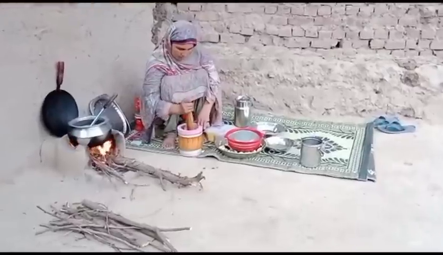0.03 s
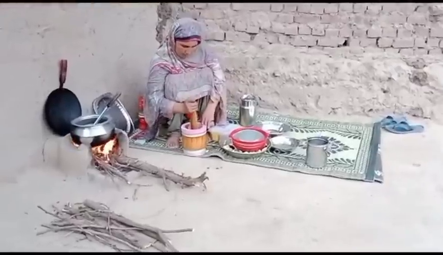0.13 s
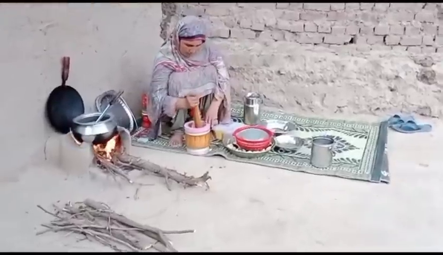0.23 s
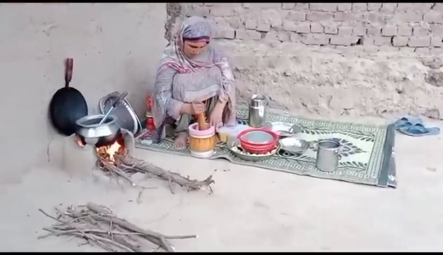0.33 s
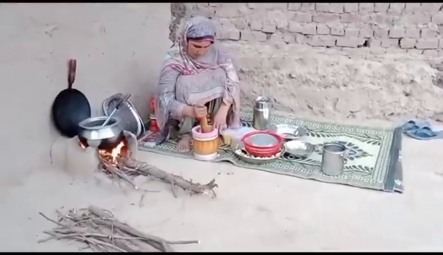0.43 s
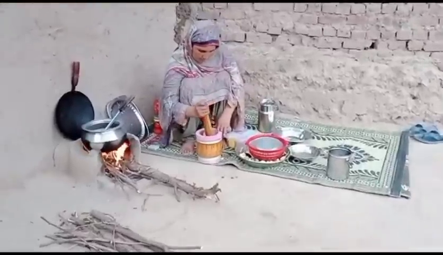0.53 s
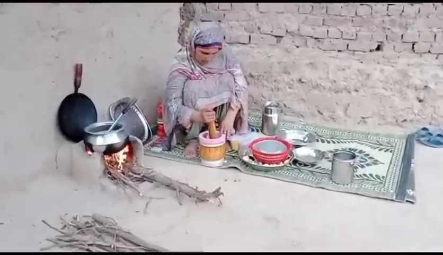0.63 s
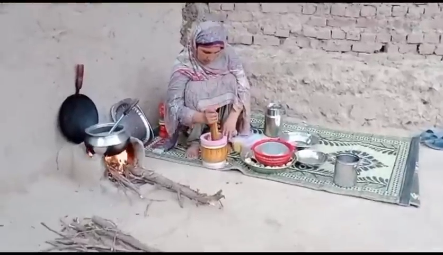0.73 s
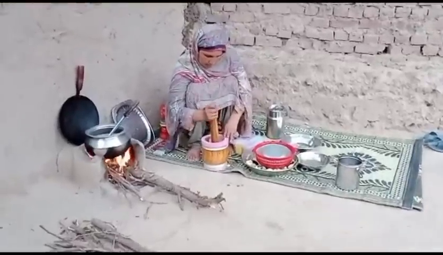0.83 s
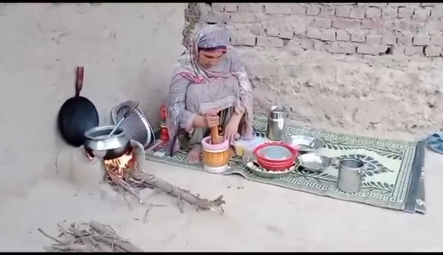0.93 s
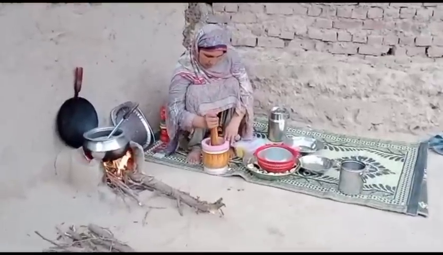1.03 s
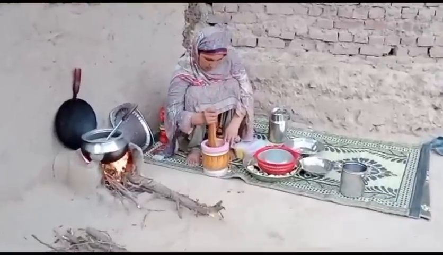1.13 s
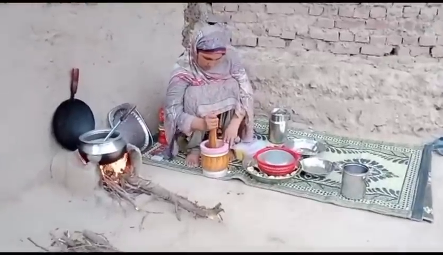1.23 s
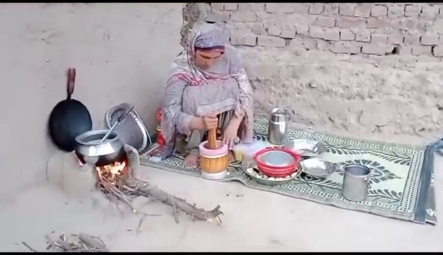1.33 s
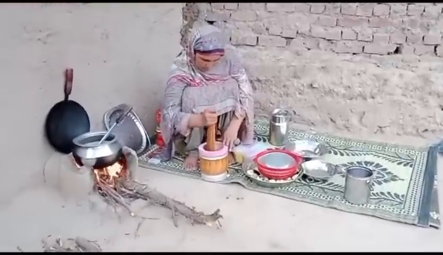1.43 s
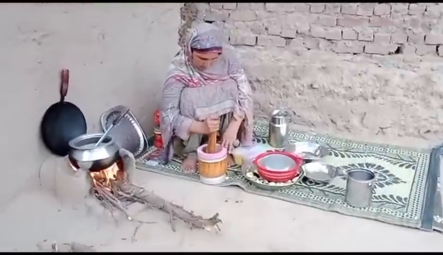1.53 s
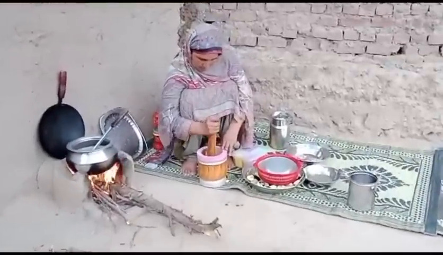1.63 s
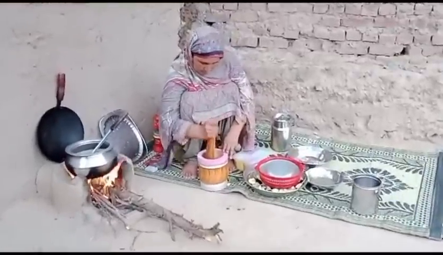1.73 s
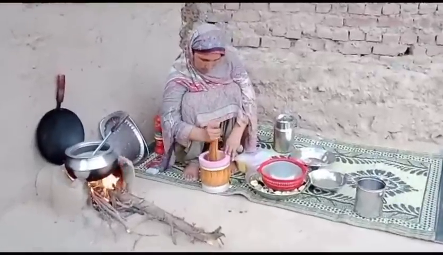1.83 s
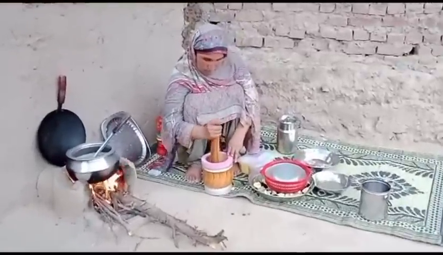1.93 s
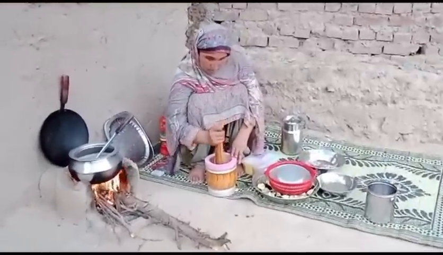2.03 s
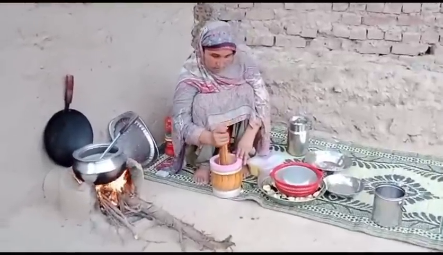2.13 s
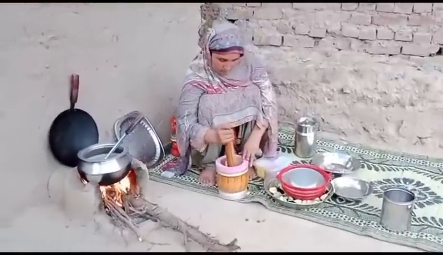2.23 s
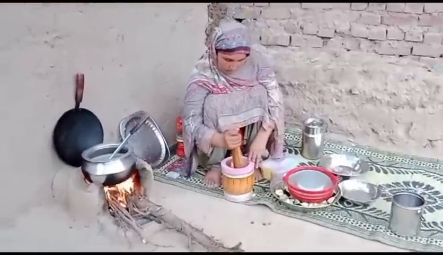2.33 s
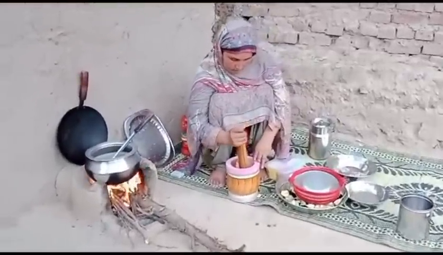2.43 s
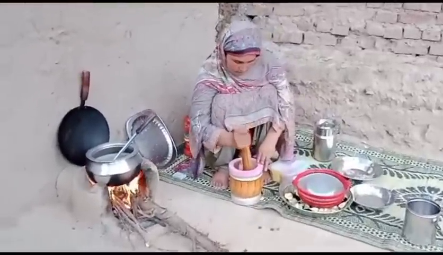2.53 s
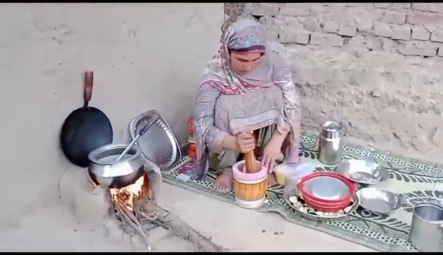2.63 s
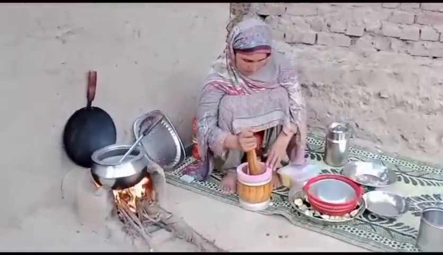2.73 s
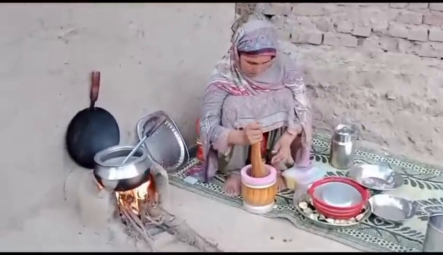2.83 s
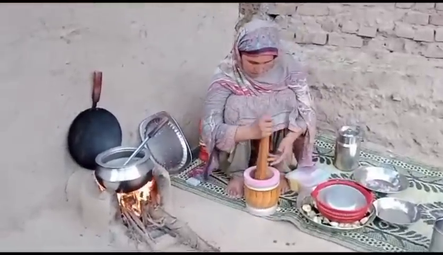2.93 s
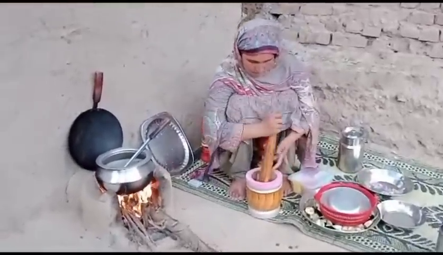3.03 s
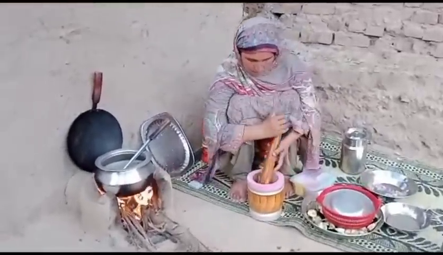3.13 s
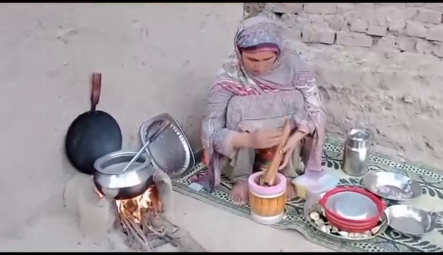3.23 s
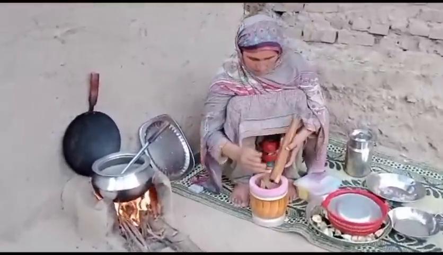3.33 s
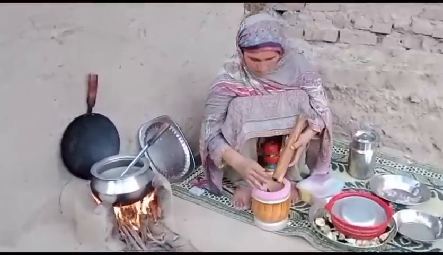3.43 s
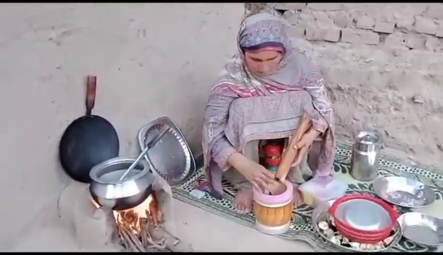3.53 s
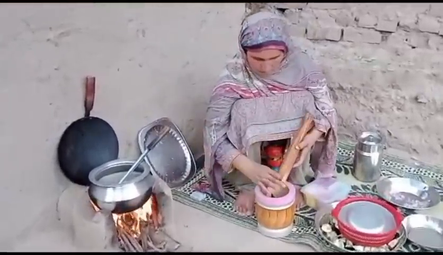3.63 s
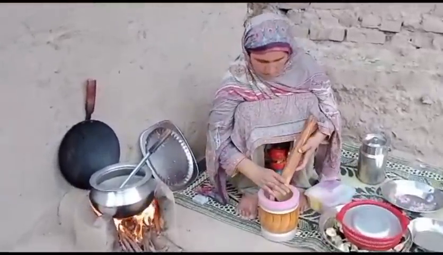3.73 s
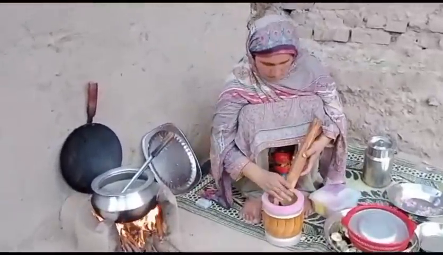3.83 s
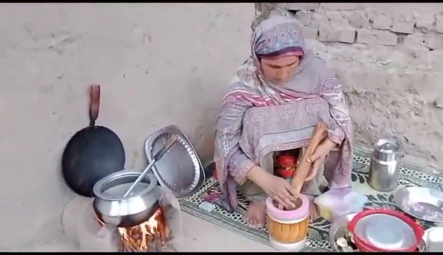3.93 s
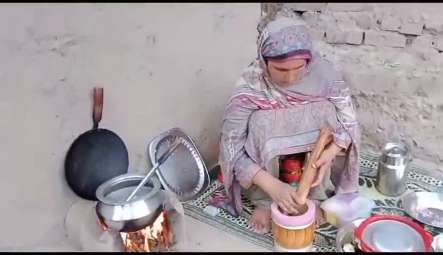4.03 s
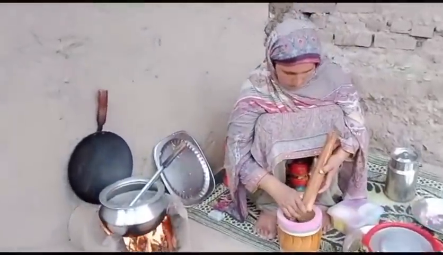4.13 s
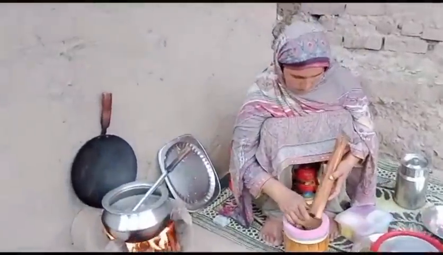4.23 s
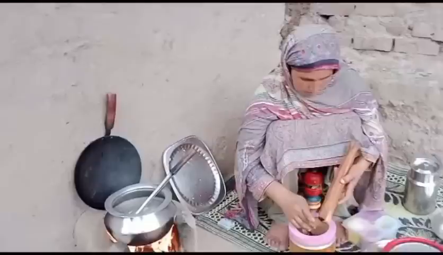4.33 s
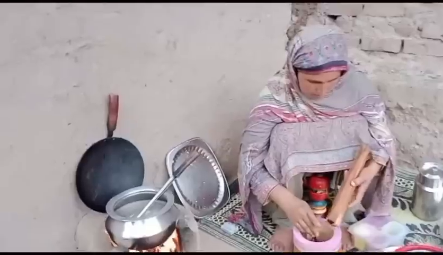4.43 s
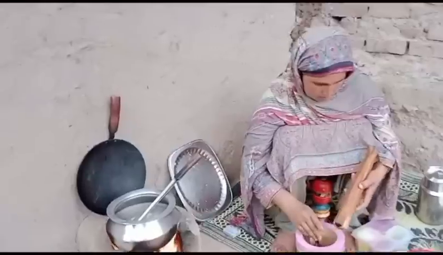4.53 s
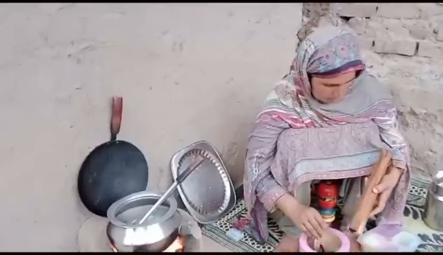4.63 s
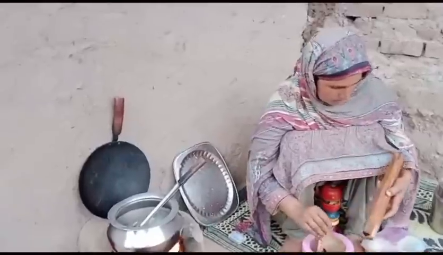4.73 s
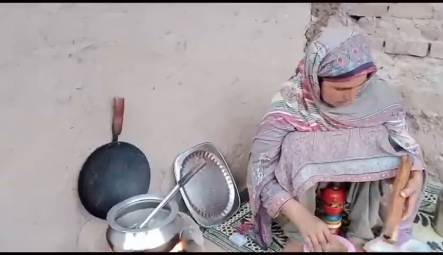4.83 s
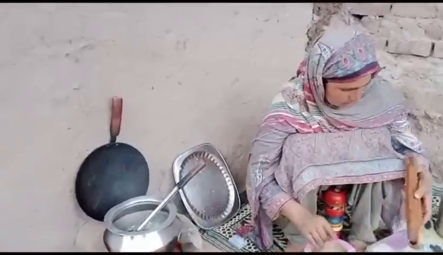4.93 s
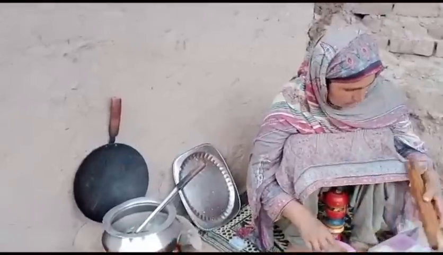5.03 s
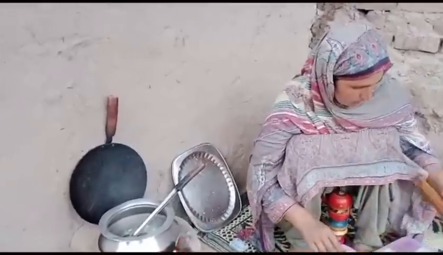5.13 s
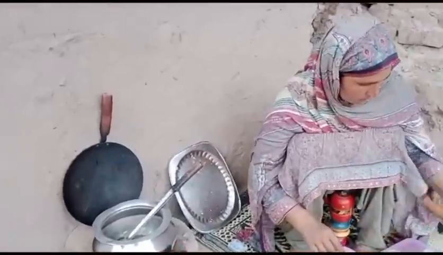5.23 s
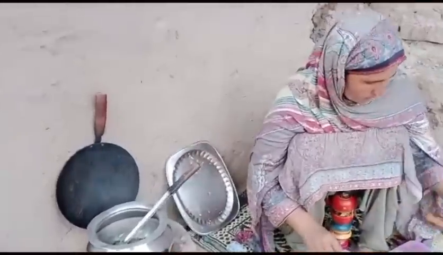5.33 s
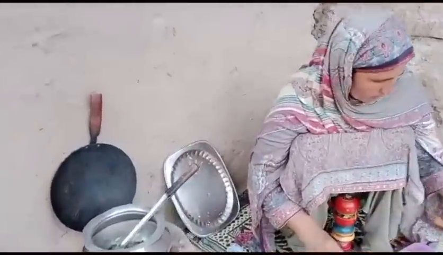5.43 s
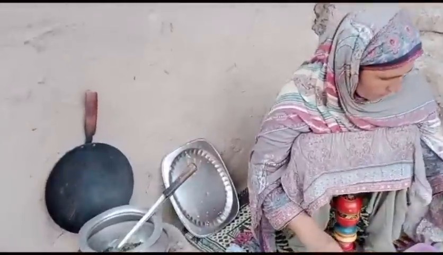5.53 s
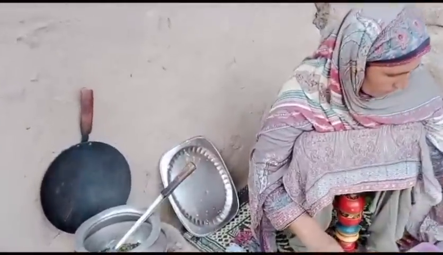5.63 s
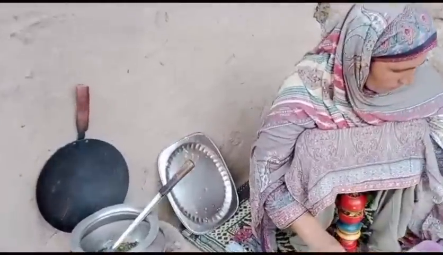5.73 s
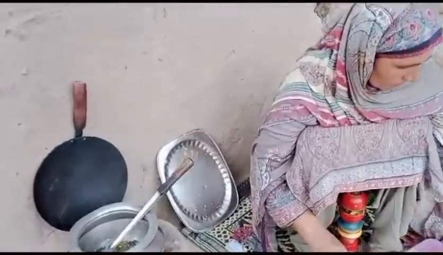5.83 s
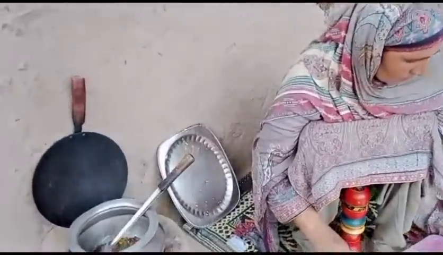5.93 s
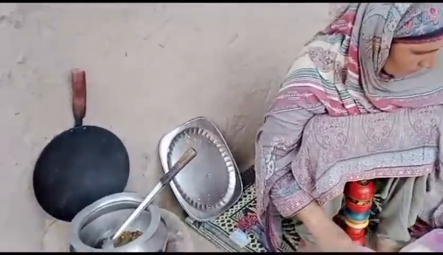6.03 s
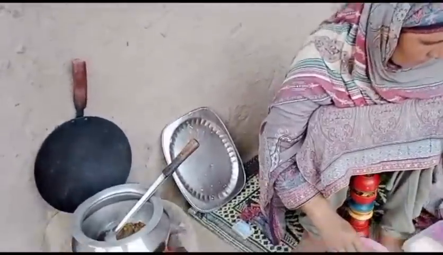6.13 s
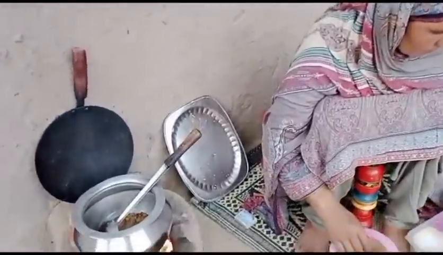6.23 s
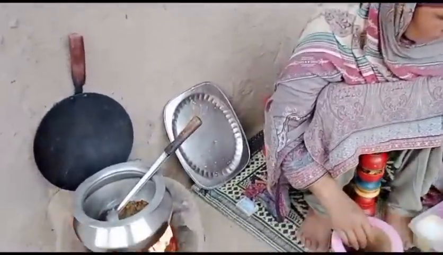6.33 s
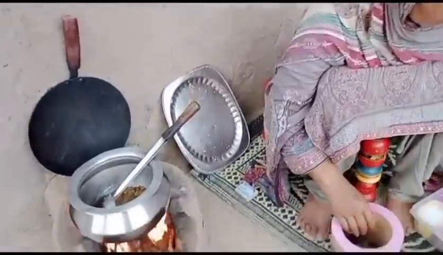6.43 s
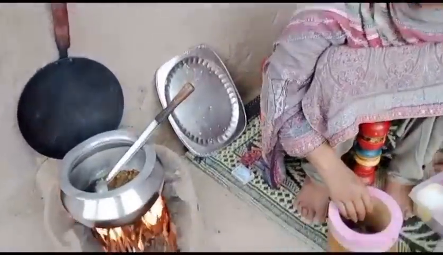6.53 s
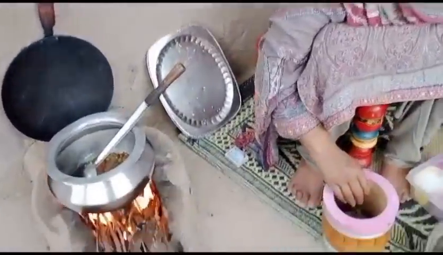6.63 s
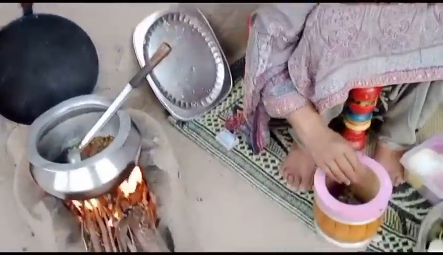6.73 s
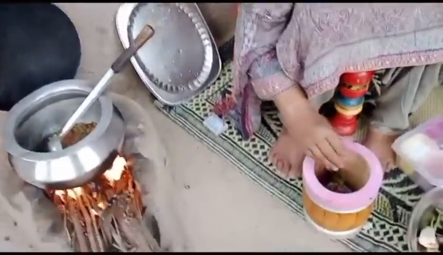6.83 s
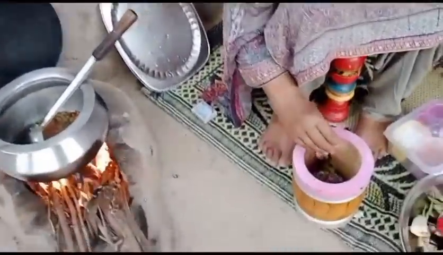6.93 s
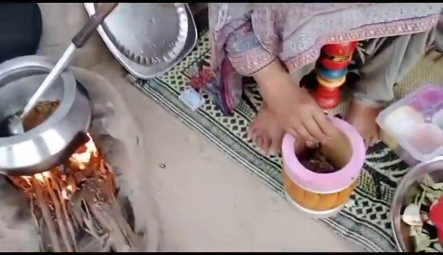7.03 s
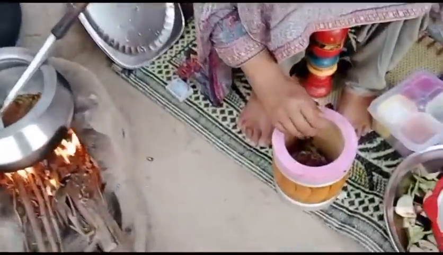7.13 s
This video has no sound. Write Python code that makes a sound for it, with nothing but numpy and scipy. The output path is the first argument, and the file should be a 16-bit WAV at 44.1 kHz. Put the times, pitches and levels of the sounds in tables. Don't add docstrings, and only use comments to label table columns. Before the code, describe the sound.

Close, loud wooden pounding in a deep mortar: hollow mid-low boomy knocks, nearly four a second, with dry spice crunch and woody clacks as the pestle grazes the wall. It stops just before three seconds. Quiet oil sizzle and spits, a soft twig fire and a far engine chug remain, with faint pot clinks. Near the end a metal door scrapes, slams and rattles. Small mud-walled yard, mono, short dull echoes.

```python
import sys
import numpy as np
from scipy import signal
from scipy.io import wavfile
from scipy.ndimage import uniform_filter1d, minimum_filter1d

SR = 44100
rng = np.random.default_rng(int(sys.argv[2]) if len(sys.argv) > 2 else 0)


def dump_mix(stems):
    frames = np.atleast_2d(stems).T
    limited = np.clip(frames, -1, 1)
    pcm = np.round(limited * 32767).astype(np.int16)
    wavfile.write(sys.argv[1], SR, pcm)


def level_to_linear(level):
    exponent = np.asarray(level, float) / 20
    return 10 ** exponent


N = 316197

# (time [s], boom [dB], build-up [ms], crushed spice [dB], grit [dB])
LANDINGS = [(0.1528, -18, 1.2, -30, -42.5), (.158, -17, 4.5, -31.5, -43.5), (.4440, -32, 1.9, -62, -61),
            (0.4543, 2.5, 5, -19, -33.5), (0.7502, -14, 3.6, -36, -32.5), (.7562, -18.5, 0.82, -24, -57.5),
            (1.0405, -16, 4.9, -42, -44), (1.0463, 3.5, 2.2, -34, -28), (1.0540, -5.5, 2.1, -62, -57),
            (1.3336, 5, 7.9, -36, -37.5), (1.3430, -13, 1.3, -54, -45), (1.616, -6.5, 13, -32, -38.5),
            (1.624, -15.5, 0.83, -26, -50), (1.8808, -1.5, 4.1, -22, -33), (2.147, -12.5, 1.4, -24.5, -31),
            (2.155, -13, 5.4, -27, -54), (2.36, -6.5, 5.8, -50, -56), (2.4045, -21, 0.89, -28, -38.5),
            (2.411, -15.5, 9.5, -24, -42), (2.6808, 3.5, 6.8, -29, -29), (3.268, -34.5, 6.7, -62, -65)]
# (pitch [Hz], level [dB], t60 [s])
HOLLOW = [
    (515.4, -1, 0.057),
    (528.6, -5.5, 0.12),
    (335, -19.5, 0.031),
    (477, -14, 0.061),
]
# (pitch [Hz], level [dB], t60 [s])
CRUSH = [(2957, -10.5, 0.047), (3355, -3, 0.011), (3674, -5, 0.032), (4200, -15, 0.0036)]
CRUSH_S = .00477


def landings():
    t = np.arange(SR // 4) / SR
    boom, crush, grit = np.zeros((3, N))
    fading = np.exp(-t / CRUSH_S)
    for s, boom_db, build_ms, crush_db, grit_db in LANDINGS:
        swell = (1 - np.exp(-t * 1600 / build_ms)) ** 2
        for hz, level_db, t60 in HOLLOW:
            decay = level_to_linear(boom_db + 2 + level_db - 60 * t / t60)
            add(boom, s, decay * swell * np.sin(2 * np.pi * hz * t))
        add(crush, s, level_to_linear(crush_db - 21) * fading)
        add(grit, s, level_to_linear(grit_db + 13.5) * fading)
    grains_db = 3.7 * np.minimum(rng.exponential(1, (2, N)), 4) - 6.5
    cracks = rng.standard_normal((2, N)) * level_to_linear(grains_db)
    crush = sum(level_to_linear(db) * ring(crush * cracks[0], hz, t60) for hz, db, t60 in CRUSH)
    grit = bandpass(grit * cracks[1], 5200, 8200, order=1)
    return boom, crush + grit


# (time [s], low knock [dB], clack [dB], rim [dB], shaft [dB])
GRAZES = [
    (0.133, -25, -22.5, -28, -41),
    (.716, -21.5, -27.5, -30, -32),
    (1.601, -26, -29, -29, -38),
    (1.847, -25, -19, -37, -25),
    (2.1146, -18.5, -11, -18, -29.5),
    (2.3588, -25, -9.5, -14.5, -17),
    (2.64, -21, -20, -23, -23),
]
# (time [s], low knock [dB], wall ring [dB], clack [dB], rim [dB])
TAPS = [
    (0.1506, -19.5, -28, -14.5, -19.5),
    (0.4558, -15, -25, -14.5, -11.5),
    (0.7504, -16.5, -46, -40, -42),
    (1.0462, -7.5, -50, -23.5, -32),
    (1.336, -30, -33.5, -43, -33),
    (1.8805, -17.5, -41, -40, -38),
    (2.1468, -16.5, -36, -35, -38),
    (2.4041, -22, -38, -38, -40),
    (2.682, -17, -35, -41, -43),
]
TAP_SHAFT_DB = -33.5
WALL_DB, WALL_FOLLOWS_KNOCK, WALL_FOLLOWS_CLACK, MEAN_DB = -25.5, 0.84, 0.25, -20.5


def touches():
    rows = [(*tap, TAP_SHAFT_DB) for tap in TAPS]
    for s, knock_db, clack_db, rim_db, shaft_db in GRAZES:
        from_knock = WALL_FOLLOWS_KNOCK * (knock_db - MEAN_DB)
        from_clack = WALL_FOLLOWS_CLACK * (clack_db - MEAN_DB)
        rows.append((s, knock_db, WALL_DB + from_knock + from_clack, clack_db, rim_db, shaft_db))
    return sorted(rows)


# (pitch [Hz], level [dB], t60 [s])
KNOCK = [(349, -8, 0.027), (570, 1, 0.03), (719, -6.5, 0.031)]
WALL = [(982, 0, 0.14), (935, -7, 0.05)]
CLACK = [(1262, -1, .022), (1130, -9, .016), (1390, -13, .016)]
RIM = [(1665, -6, 0.018), (1930, -17, 0.02), (1480, -14, 0.016)]
SHAFT = [(3036, -6, 0.036), (3170, -0.5, 0.018), (3550, -9, 0.028), (4400, -18.5, 0.032),
         (2345, -13.5, .026)]
SWELLS_S = [.0008, .022, .0008, .001, .0008]
DETUNE_PER_DB = .0025
PRESSED_S, CHOKE_S = .012, .006


def grazes():
    out, t = np.zeros(N), np.arange(SR // 5) / SR
    lands, taps = np.array(LANDINGS)[:, 0], np.array(TAPS)[:, 0]
    rows = touches()
    chatter = .22 * np.exp(-t / .002) * (rng.random((len(rows), len(t))) < .05)
    chatter[:, 0] = 1
    spreads_db = rng.normal(0, 2.8, (len(rows), 5, 5))
    groups = [KNOCK, WALL, CLACK, RIM, SHAFT]
    for (s, *levels_db), slips, spread_db in zip(rows, chatter, spreads_db):
        sound = np.zeros(len(t))
        for group_db, modes, swell_s, extras_db in zip(levels_db, groups, SWELLS_S, spread_db):
            swell = 1 - np.exp(-t / swell_s)
            for (hz, db, t60), extra_db in zip(modes, extras_db):
                mode = ring(slips, hz * (1 + DETUNE_PER_DB * extra_db), t60) * swell
                sound += level_to_linear(group_db + db + extra_db) * peak_one(mode)
        sound += yard(sound, strength_db=-3)
        free_s = PRESSED_S if s in taps else lands[lands > s + PRESSED_S][0] - s
        add(out, s, sound * np.exp(-np.maximum(t - free_s, 0) / CHOKE_S))
    return bandpass(out, 280, 5500, order=2)


# (delay [s], level [dB])
YARD = [(.0085, -15), (.0135, -19), (.0195, -12), (.027, -22), (.034, -26)]


def yard(x, strength_db):
    dull, out = signal.lfilter([.3], [1, -.7], x), np.zeros(len(x))
    for lag_s, level_db in YARD:
        add(out, lag_s, level_to_linear(level_db + strength_db) * dull)
    return out


DRAG_S, DRAG_DB, DRAG_ATTACK_S = 6.733, -34, .006
SLAM_S, SLAM_DB, SLAM_ATTACK_S = 6.7905, -13, .002
BLOW_DB, BLOW_S = 6.5, .0038
RATTLE_S, RATTLE_DB_PER_S, SETTLE_DB_PER_S = .083, 67, 330
SHUDDER_DB, SHUDDER_S, STOP_S = -41, .16, .025
SILENT_DB = -76


def door_forces():
    drag = [(DRAG_S - DRAG_ATTACK_S, SILENT_DB), (DRAG_S, DRAG_DB),
            (SLAM_S, DRAG_DB), (SLAM_S + STOP_S, SILENT_DB)]
    after_s = np.arange(N) / SR - SLAM_S
    free_db = RATTLE_DB_PER_S * np.clip(after_s, 0, RATTLE_S)
    settling_db = SETTLE_DB_PER_S * np.maximum(after_s - RATTLE_S, 0)
    hit_db = np.interp(after_s, [-SLAM_ATTACK_S, 0, BLOW_S], [SILENT_DB, BLOW_DB, 0])
    shudder_db = np.interp(after_s, [-SLAM_ATTACK_S, 0, SHUDDER_S, SHUDDER_S + STOP_S],
                           [SILENT_DB, SHUDDER_DB, SHUDDER_DB, SILENT_DB])
    return in_time(drag)[0], np.maximum(SLAM_DB - free_db - settling_db + hit_db, shudder_db)


def sheet(force, spectrum, count, t60, dulling):
    pitches = np.geomspace(spectrum[0][0], spectrum[-1][0], count) * (1 + rng.normal(0, .013, count))
    out = 0
    for hz in pitches:
        shake = force * dulling ** (hz / 1000) * rng.choice([-1, 1], len(force))
        level = level_to_linear(at_hz(spectrum, hz) + rng.normal(0, 2.8)) * hz ** .75
        out = out + level * ring(shake, hz, t60 * (1000 / hz) ** .086)
    return out


# (pitch [Hz], level [dB per Hz])
DRAG_TONE = [(88, -40), (150, -5), (444, 0), (748, 2.5), (1370, -19), (1530, -1), (1800, -20), (4000, -40),
             (5200, -65), (8800, -120)]
# (pitch [Hz], level [dB per Hz])
SHEET = [(110, -56), (190, -23), (530, -1), (796, -6), (1280, -16.5), (1430, -11), (1640, -21), (1960, -3),
         (2140, -23.5), (3510, -9), (3910, -24), (4920, -18), (5660, -24.5), (7250, -16.5), (13000, -65)]
# (pitch [Hz], late level [dB], t60 [s])
DOOR_RING = [(1335, -42, .45), (1534, -54, .15), (1798, -60, .12), (1917, -61, .11), (1960, -52, .2),
             (2026, -62, .11), (2500, -58, .16), (3392, -62, .11), (3650, -64, .11), (3850, -59, .2),
             (4089, -55, .33), (4150, -63, .18), (4430, -64, .14)]
THROB_DB, THROBS_PER_S = 1.5, 70


def door():
    first = round(6.7 * SR)
    late = slice(round(.23 * SR), round(.29 * SR))
    rattle = rng.standard_normal(N - first) * level_to_linear(2 * np.minimum(rng.exponential(1, N - first), 4))
    rattle = rms_one(rattle * level_to_linear(THROB_DB * drift(THROBS_PER_S)[first:]))
    dulling = level_to_linear(-15 * np.maximum(np.arange(first, N) / SR - SLAM_S, 0))
    drag, slam = [rattle * level_to_linear(force_db[first:]) for force_db in door_forces()]
    body = 0
    for force, spectrum, count in [(drag, DRAG_TONE, 40), (slam, SHEET, 220)]:
        modes = sheet(force, spectrum, count, t60=.072, dulling=dulling)
        body = body + modes * np.std(force) / np.std(modes)
    for hz, db, t60 in DOOR_RING:
        part = ring(slam * rng.choice([-1, 1], len(slam)), hz, t60)
        body = body + level_to_linear(db) * part / np.std(part[late])
    return np.pad(bandpass(body, 215, 9500, order=3), (first, 0))


# (pitch [Hz], level [dB per Hz])
SIZZLE = [(2000, -36), (3400, -39), (3690, -18), (3960, -21.5), (5520, 1), (7590, 9), (11200, -9),
          (14600, -10.5), (15600, -16)]
# (time [s], level [dB])
FRYING = [(0.0, -50.5), (0.32, -49.5), (1.2, -50.5), (1.64, -52), (2.21, -50), (3.3, -52.5), (3.85, -49.5),
          (4.35, -51), (6.09, -50), (6.45, -48.5), (6.75, -49.5), (7.17, -51)]


def sizzle():
    sizes = level_to_linear(4 * np.minimum(rng.exponential(1, (2, N)), 4)) * rng.choice([-1, 1], (2, N))
    bursts = sizes * (rng.random((2, N)) < 1500 * level_to_linear(2.5 * drift(9)) / SR)
    raw = rms_one(bursts) + rng.standard_normal((2, N))
    spectrum = SIZZLE + [(16500, SIZZLE[-1][1])]
    return level_to_linear(in_time(FRYING)[0] + .3) * banded_noise(spectrum, raw, count=18, patchy_db=2.17, rate=18)


# (time [s], peak [dB], pitch [Hz])
SPITS = [(0.269, -33, 7000), (0.5217, -33.5, 6800), (0.697, -33.5, 6600), (0.929, -34.5, 7450),
         (1.0854, -36, 7200), (1.308, -28.5, 7000), (1.3972, -36, 6500), (1.734, -32, 8160),
         (1.9957, -37.5, 6840), (2.445, -32.5, 7040), (3.496, -36, 7040), (3.876, -36, 7750),
         (4.3283, -28, 7580), (4.914, -33, 7550), (4.9631, -38.5, 6200), (5.3278, -33, 7650),
         (5.7009, -36, 7740), (5.791, -35, 7500), (6.567, -35, 7610), (6.6813, -33.5, 7600),
         (6.964, -31.5, 6800), (6.987, -31, 7500)]
SPIT_SPREAD = 1.107


def spits():
    return puffs([(*spit, SPIT_SPREAD) for spit in SPITS])


# (time [s], peak [dB], pitch [Hz], spread [ratio])
SNAPS = [
    (4.196, -42, 14800, 1.1),
    (4.418, -36.5, 800, 2.4),
    (4.746, -44, 12100, 1.06),
    (5.048, -47, 11000, 1),
    (5.048, -47, 4400, 1.07),
    (4.328, -38, 10700, 1.1),
    (2.1, -43, 4200, 1.15),
]


def snaps():
    return puffs(SNAPS)


# (pitch [Hz], level [dB per Hz])
FLAME = [(12, -85), (20, -2), (43, -23.5), (54, -3.5), (106, -0.5), (143, -20.5), (175, -4), (266, -8),
         (442, -9), (597, -2.5), (718, -9.5), (1040, -12), (1650, -13.5), (3700, -21.5), (5000, -20),
         (6500, -62), (11000, -120)]
FLAME_DB = -49.5


def flames():
    white = rng.standard_normal((2, N))
    return level_to_linear(FLAME_DB) * banded_noise(FLAME, white, count=28, patchy_db=1.8, rate=12.6)


# (pitch [Hz], width [Hz], level [dB])
ENGINE = [(65, 11, -61.5), (103.6, 6, -57.5), (173.9, 6.7, -63)]
# (pitch [Hz], width [Hz], level [dB])
CHUG = [(1650, 48, -6.5), (2240, 96, -5), (2580, 470, -5), (3034, 61, -9)]
# (time [s], level [dB])
CHUG_LEVEL = [(0, -55.5), (1.5, -57.5), (3, -57.5), (4.2, -59), (5, -57.5), (5.8, -64), (7.17, -64)]
CYLINDERS_DB = [-3.5, -3.5, -4]
CHUGS_PER_S = 11.6


def engine():
    firings = np.cumsum(3 * CHUGS_PER_S * (1 + .002 * drift(1.5))) / SR + 1.15
    strength_db = np.array(CYLINDERS_DB)[firings.astype(int) % 3] + 2.3 * drift(17)
    exhaust = np.exp(-3.5 * (firings % 1)) * level_to_linear(strength_db)
    hum, pipe = 0, 0
    for hz, width_hz, db in ENGINE:
        hum = hum + level_to_linear(db) * rms_one(ring(rng.standard_normal(N), hz, 3.1 / width_hz))
    for hz, width_hz, db in CHUG:
        pipe = pipe + level_to_linear(db) * rms_one(ring(exhaust * rng.standard_normal(N), hz, 3.1 / width_hz))
    return hum + level_to_linear(in_time(CHUG_LEVEL)[0]) * bandpass(pipe, 1300, 3600, order=2)


# (time [s], level [dB], pitch [Hz], t60 [s])
CLINKS = [
    (.248, -31, 1650, 0.049),
    (3.501, -44, 1270, 0.18),
    (4.55, -41.5, 944, 0.18),
    (5.95, -53, 804, 1),
    (6.411, -43.5, 1173, 0.21),
    (6.569, -53, 1150, .2),
]


def clinks():
    out, t = np.zeros(N), np.arange(SR // 3) / SR
    for s, db, hz, t60 in CLINKS:
        attack = 1 - np.exp(-t / .012)
        add(out, s, level_to_linear(db - 60 * t / t60) * attack * np.sin(2 * np.pi * hz * t))
    return out


def puffs(rows):
    out, t = np.zeros(N), np.arange(600) / SR
    for s, peak_db, hz, ratio in rows:
        ratio = max(ratio, 1.05)
        burst = rng.standard_normal(600) * np.exp(-t / .0045)
        add(out, s, level_to_linear(peak_db) * peak_one(bandpass(burst, hz / ratio, min(hz * ratio, 19000), order=2)))
    return out


def banded_noise(spectrum, white, count, patchy_db, rate):
    out, together = 0, drift(1.7)
    edges = np.geomspace(spectrum[0][0], spectrum[-1][0], count + 1)
    for k, (low, high) in enumerate(zip(edges, edges[1:])):
        level_db = at_hz(spectrum, np.sqrt(low * high))
        flicker_db = patchy_db * (.06 * together + drift(rate))
        out = out + bandpass(white[k % 2], low, high, order=2) * level_to_linear(level_db + flicker_db)
    return rms_one(out)


def ring(force, hz, t60):
    r, w = level_to_linear(-60 / (t60 * SR)), 2 * np.pi * hz / SR
    return signal.lfilter([0, np.sin(w)], [1, -2 * r * np.cos(w), r * r], force + 1e-18)


def drift(rate):
    r = np.exp(-80 * np.pi * rate / SR)
    slow = signal.lfilter([1], [1, -2 * r, r * r], rng.standard_normal(N // 40 + 2002))[2000:]
    return np.interp(np.arange(N) / 40, np.arange(len(slow)), rms_one(slow))


def bandpass(x, low_hz, high_hz, order):
    return signal.sosfilt(signal.butter(order, [low_hz, high_hz], "band", fs=SR, output="sos"), x)


def at_hz(points, hz):
    return np.interp(np.log(hz), np.log(np.array(points)[:, 0]), np.array(points)[:, 1])


def in_time(rows):
    s, *columns = np.transpose(rows)
    return [np.interp(np.arange(N) / SR, s, c) for c in columns]


def add(track, s, sound):
    i = round(s * SR)
    track[i:i + len(sound)] += sound[:len(track) - i]


def rms_one(x):
    return x / np.sqrt(np.mean(x ** 2) + 1e-20)


def peak_one(x):
    return x / np.abs(x).max()


FAR_WALL_S, FAR_WALL_DB = .102, -41.5


def scene():
    boom, spice = landings()
    mortar = boom + spice + yard(spice, strength_db=-23) + grazes()
    add(mortar, FAR_WALL_S, level_to_linear(FAR_WALL_DB) * mortar.copy())
    pot = sizzle() + spits()
    fire = flames() + snaps()
    return (mortar + door() + pot + fire + engine() + clinks())[None]


def low_pass(x):
    return signal.sosfilt(signal.butter(12, 15940, fs=SR, output="sos"), x)


LIMIT_DB, CUTOFF_HZ = -.15, 16080


def record(dry):
    gain = minimum_filter1d(np.minimum(1, level_to_linear(LIMIT_DB) / (np.abs(dry) + 1e-9)), size=121)
    held = dry * uniform_filter1d(gain, size=61)
    mix = signal.sosfilt(signal.cheby2(16, 60, CUTOFF_HZ, fs=SR, output="sos"), held)
    return low_pass(mix)


dry = scene()
out = record(dry)
dump_mix(out)
```